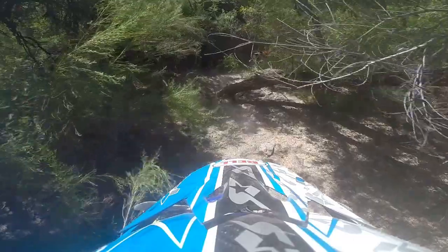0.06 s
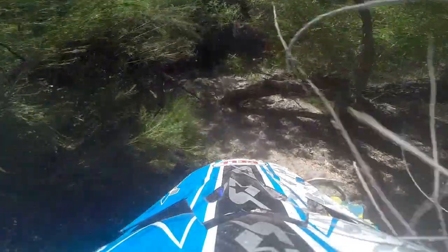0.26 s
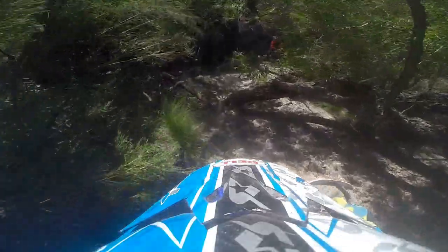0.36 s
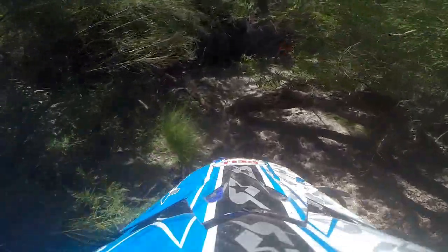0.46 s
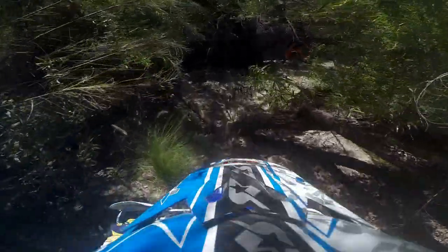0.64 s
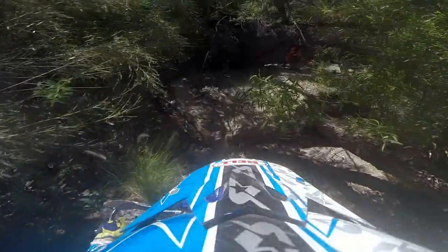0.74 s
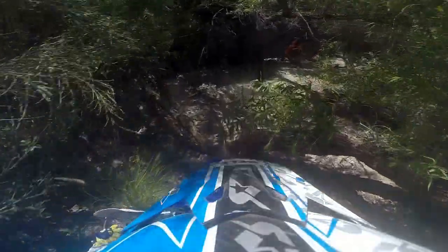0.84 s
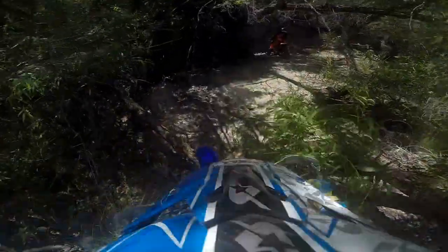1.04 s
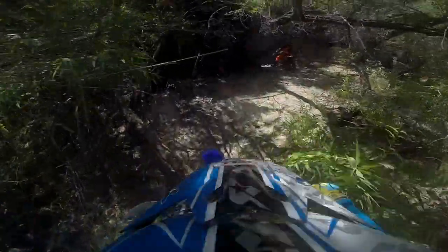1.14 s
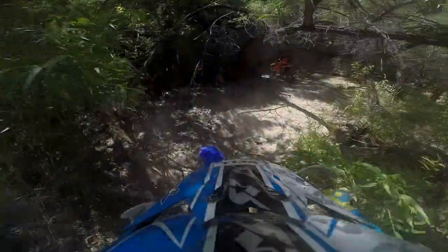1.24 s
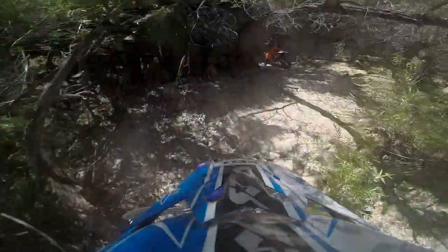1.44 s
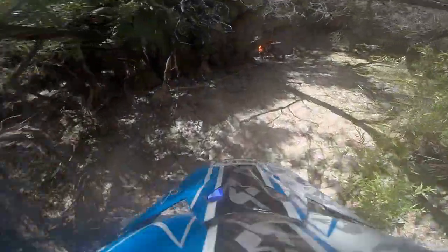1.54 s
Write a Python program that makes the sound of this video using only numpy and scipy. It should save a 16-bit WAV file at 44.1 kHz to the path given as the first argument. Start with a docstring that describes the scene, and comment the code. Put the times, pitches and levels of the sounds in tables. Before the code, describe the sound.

A two-stroke dirt bike putters along a brushy trail, heard from a helmet microphone. A branch knocks loudly and drags across it with a squeak. The throttle blips once, then another branch cracks against it, over light wind rumble.

```python
"""A two-stroke dirt bike creeps along a brushy trail, heard from a helmet camera.
The engine pops near idle and gets one blip of throttle; each firing echoes in the exhaust pipe
and rattles the cylinder. Wind buffets the microphone. Twice, branches knock on the camera housing,
hard enough to overload it; the first time, a branch also drags across it with a stick-slip squeak."""
import sys
import numpy as np
from scipy import signal
from scipy.fft import rfft, irfft
from scipy.io import wavfile

SR = 44100
rng = np.random.default_rng(int(sys.argv[2]) if len(sys.argv) > 2 else 0)


def pcm_store(signal):
    """Save signal as 16-bit PCM."""
    levels = np.round(np.clip(np.atleast_2d(signal), -1, 1) * 32767)
    wavfile.write(sys.argv[1], SR, levels.astype(np.int16).T)


N = 70560
T = np.arange(N) / SR


def from_db(db):
    """Decibels to gain."""
    return 10 ** (np.asarray(db) / 20)


def unit_rms(x):
    """Scale to unit rms."""
    return x / np.sqrt(np.mean(x ** 2) + 1e-20)


def curve(rows, column=1):
    """One column of a time table, interpolated per sample."""
    columns = np.transpose(rows)
    return np.interp(T, columns[0], columns[column])


def noise(spectrum, tilt_db_oct=0):
    """Unit-rms shaped noise; skirts fall 20 dB per octave before the tilt."""
    hz, db = np.transpose(spectrum)
    octave = np.log2(np.maximum(np.arange(N // 2 + 1) * SR / N, 1))
    outside = np.abs(octave - np.clip(octave, np.log2(hz[0]), np.log2(hz[-1])))
    shape_db = np.interp(octave, np.log2(hz), db) + tilt_db_oct * octave - 20 * outside
    return unit_rms(irfft(rfft(rng.standard_normal(N)) * from_db(shape_db), N))


def drift(rate_hz):
    """Smooth random modulation, unit rms."""
    return noise([(rate_hz / 10, 0), (rate_hz, 0)])


def resonate(x, modes):
    """Parallel two-pole resonators."""
    out = 0
    for hz, width_hz, db in modes:
        r = np.exp(-np.pi * width_hz / SR)
        b = np.array([1, 0, -1]) * (1 - r * r) / 2
        a = [1, -2 * r * np.cos(2 * np.pi * hz / SR), r * r]
        out = out + from_db(db) * signal.lfilter(b, a, x)
    return out


def burst(start_s, rise_s, decay_s):
    """Envelope: fast attack, exponential decay."""
    age_s = np.maximum(T - start_s, 0)
    return (1 - np.exp(-age_s / rise_s)) * np.exp(-np.minimum(age_s / decay_s, 80))


def play(clicks, shape):
    """One copy of the shape per click."""
    return signal.fftconvolve(clicks, shape)[:N]


# engine speed: (time [s], firing rate [Hz])
FIRING_RATE = [(0.0, 27.84), (0.2, 31.4), (0.38, 25.34), (0.7, 25.94), (0.98, 24.7), (1.07, 35.44),
               (1.13, 40.43), (1.2, 41.83), (1.35, 26.73), (1.45, 36.67), (1.6, 35.82)]
FIRING_ANCHOR_S, FIRING_JITTER_DB = 0.638, 0.5


def firings():
    """One click per crank turn, slightly uneven in strength."""
    turns = np.cumsum(curve(FIRING_RATE)) / SR
    whole_turns = np.floor(turns - np.interp(FIRING_ANCHOR_S, T, turns))
    clicks = np.diff(whole_turns, prepend=whole_turns[0])
    return clicks * from_db(FIRING_JITTER_DB * rng.standard_normal(N))


def muffler(x, low_hz=115, high_hz=894):
    """The muffler band-passes the pressure pulses, taking off their edge."""
    band = signal.butter(2, [low_hz, high_hz], "band", fs=SR, output="sos")
    return signal.sosfilt(band, x + 1e-18)


# pressure wave and its pipe reflections: (delay [s], gain [ratio])
PIPE_ECHOES = [(0, 1.0), (.0023, 0.98), (.0040, -1.5), (.0061, 0.17), (.0086, 0.14), (0.0104, -0.018),
               (0.0141, -0.33), (0.0191, -0.6)]
# pipe resonances: (frequency [Hz], width [Hz], gain [dB])
PIPE_MODES = [(184.7, 62, 0.5), (379, 35, 4.5), (470, 42, 0)]
# gas leaving the pipe: (frequency [Hz], density [dB])
CHUFF_SPECTRUM = [(90, -15.5), (150, 5.5), (400, -11.5), (600, 0.5), (1000, -23.5)]
# pops at the microphone: (time [s], level [dB])
POP_LEVEL = [(0, -50), (.11, -41), (.16, -37.5), (.23, -34.5), (.39, -56.5), (.56, -49.5), (.72, -45),
             (.755, -47.5), (.83, -44), (.915, -43), (.955, -45.5), (.99, -38), (1.07, -34), (1.14, -31),
             (1.21, -45.5), (1.29, -34), (1.36, -65), (1.40, -43), (1.46, -45.5), (1.52, -57.5),
             (1.6, -64.5)]
# narrow pipe resonances: (frequency [Hz], width [Hz], gain [dB])
BOOM_MODES = [(186, 9.3, 14), (351, 10, -23.5), (426, 35, -3.5)]
# pipe boom, peaking as the throttle opens: (time [s], level [dB])
BOOM_LEVEL = [(0, -35.5), (.22, -47.5), (.39, -65), (.9, -50), (1.0, -54), (1.07, -26), (1.13, -36.5),
              (1.2, -33), (1.28, -52), (1.36, -68), (1.44, -48), (1.6, -58.5)]
POP_RISE_S, CHUFF_DB = 0.00017, -11.5


def exhaust(fired):
    """Each pop bounces along the pipe, sets it booming and exits with a chuff of gas."""
    wave = sum(gain * burst(delay_s, POP_RISE_S, decay_s=0.0015) for delay_s, gain in PIPE_ECHOES)
    pops = muffler(play(fired, wave))
    pops = unit_rms(pops + resonate(pops, PIPE_MODES))
    gas_flow = play(fired, burst(0, POP_RISE_S, decay_s=0.048))
    chuff = from_db(CHUFF_DB) * unit_rms(noise(CHUFF_SPECTRUM) * gas_flow)
    boom = unit_rms(resonate(muffler(fired), BOOM_MODES))
    return from_db(curve(POP_LEVEL)) * (pops + chuff) + from_db(curve(BOOM_LEVEL)) * boom


# cylinder excitation: (frequency [Hz], density [dB])
CYLINDER_DRIVE = [(500, -4), (1200, -0.5), (3600, -1), (6000, -2.5), (9000, -6.5), (14000, -27)]
# cylinder resonances: (frequency [Hz], width [Hz], gain [dB])
CYLINDER_MODES = [(1276, 45, 0.5), (1630, 83, -6), (1856, 66, -5), (2180, 70, -14), (2610, 100, -13.5),
                  (2880, 50, -12), (3305, 32, -8)]
# rattle after each firing: (frequency [Hz], density [dB])
RATTLE_SPECTRUM = [(500, -10.5), (1200, 4), (1900, -2), (3000, -11.5), (6000, -24.5)]
# broadband clatter: (frequency [Hz], density [dB])
CLATTER_SPECTRUM = [(300, -1), (500, -4.5), (600, -17), (800, -10), (1100, -10), (1450, -17), (1900, -9.5),
                    (2300, -13), (2700, -20), (3400, -15.5), (4000, -20.5), (5000, -23), (6000, -29),
                    (8000, -36.5), (11000, -40), (13500, -51.5), (16000, -77.5)]
# all mechanical noise: (time [s], level [dB])
CLATTER_LEVEL = [(0, -30), (.07, -38.5), (.13, -38.5), (.23, -42.5), (.39, -56), (.55, -54), (.7, -51.5),
                 (.8, -48.5), (.97, -45.5), (1.02, -40), (1.07, -32), (1.17, -33), (1.22, -37.5),
                 (1.28, -41.5), (1.38, -46), (1.45, -48), (1.52, -51), (1.6, -50.5)]
CYLINDER_DB, RATTLE_DB, BROADBAND_DB = -4, -8, -5


def clatter(fired):
    """Piston and cylinder clatter throughout and rattle just after each firing."""
    beat = 1 + play(fired, burst(0, rise_s=0.00069, decay_s=0.036))
    cylinder = from_db(CYLINDER_DB) * unit_rms(resonate(beat * noise(CYLINDER_DRIVE), CYLINDER_MODES))
    shake = play(fired, burst(0, POP_RISE_S, decay_s=0.02))
    rattle = from_db(RATTLE_DB) * unit_rms(shake * noise(RATTLE_SPECTRUM))
    broadband = from_db(BROADBAND_DB) * unit_rms(beat * noise(CLATTER_SPECTRUM))
    return from_db(curve(CLATTER_LEVEL)) * (broadband + cylinder + rattle)


# microphone rumble: (frequency [Hz], density [dB])
WIND_SPECTRUM = [(12, 2.5), (25, -13.5), (60, -8), (110, -4.5), (200, -13), (500, -44.5)]
# wind rumble, dropping after the knocks and slowly returning: (time [s], relative level [dB])
WIND_LEVEL = [(0, -30), (.2, -33.5), (.4, -48), (.7, -49), (.8, -43.5), (.9, -43), (1.1, -34.5),
              (1.3, -35.5), (1.45, -55), (1.6, -39.5)]


def wind(gain_db=-3.5):
    """Wind buffets the microphone with a low rumble."""
    return from_db(gain_db + curve(WIND_LEVEL)) * noise(WIND_SPECTRUM)


# shell resonances: (frequency [Hz], width [Hz], gain [dB])
HOUSING_MODES = [(1050, 45, -6.5), (1916, 23, -4), (2384, 70, -2), (3225, 110, -3.5), (3712, 40, -4),
                 (4810, 110, -3.5), (5640, 110, -5), (5930, 120, 1.5), (8480, 260, -5)]


def housing(contact, gain_db=-3.5):
    """The plastic shell transmits a contact and adds its resonances."""
    return from_db(gain_db) * (contact + resonate(contact, HOUSING_MODES))


# sharp knocks and faint ticks:
# (time [s], crack level [dB], decay [s], tilt [dB/octave], ring [Hz], ring level [dB])
KNOCKS = [(0.2482, -5, 0.0071, -0.8, 1103, -7), (0.2555, -10, 0.0035, -5, 3187, -14),
          (0.2598, -3, 0.0051, -3, 1220, -20), (0.2605, -11, 0.015, 0.5, 1770, -13),
          (.3290, -24.5, .008, 2.5, 3640, -6.5), (0.3372, -28.5, 0.016, -2, 1830, -26),
          (0.3447, -8, 0.0057, 2.5, 5894, -8.5), (0.352, -8, 0.0046, 0, 5300, -17),
          (0.3587, -16, 0.0026, 0.5, 2280, -19.5), (1.034, -28, .005, -5.5, 2930, -28),
          (1.2762, -5.5, 0.0026, 0.5, 3140, -9.5), (1.2828, -17, 0.0022, -3, 2600, -16),
          (1.2868, -21, 0.0028, 11, 3180, -20), (1.2912, -4.5, 0.0035, 1, 5670, -3),
          (1.2980, -15, .002, -7, 5444, -21.5), (1.3028, -12, 0.0034, 0, 3240, -15.5),
          (1.3150, -1.5, 0.0025, -1, 3090, 0), (1.3206, -25.5, 0.0046, 3, 3050, -17.5),
          (1.354, -50, .004, 2.5, 1990, -32), (1.3596, -37, 0.01, -3, 1270, -37),
          (1.376, -44.5, 0.0016, 5.5, 6150, -39)]
# contact on the shell: (frequency [Hz], density [dB])
CONTACT_SPECTRUM = [(120, -9.5), (200, -12), (400, -14.5), (700, -8.5), (950, -19), (1200, -3), (1800, -1),
                    (2300, -4), (3100, -1), (4200, -6.5), (5700, -9), (6800, -10.5), (8000, -18.5),
                    (9300, -12.5), (10700, -24), (13000, -27), (16000, -39)]
# mount and its metal parts: (frequency [Hz], level re crack [dB], T60 [s])
MOUNT_MODES = [(2864, -47.5, .12), (4950, -39.5, 0.19), (5630, -35, 0.075)]
KNOCK_GRAIN_DB, TICK_DB, TICK_TILT_DB_OCT, RING_PEAK_S = 2, 3, 4, 0.00099


def knocks():
    """Sharp knocks and faint ticks: each excites the housing and mount and rings at its own pitch."""
    cracks, rings = np.zeros(N), np.zeros(N)
    grain = from_db(KNOCK_GRAIN_DB * drift(900))
    for start_s, crack_db, decay_s, tilt_db_oct, ring_hz, ring_db in KNOCKS:
        crack = burst(start_s, rise_s=0.000067, decay_s=decay_s) * noise(CONTACT_SPECTRUM, tilt_db_oct)
        bright_noise = noise(CONTACT_SPECTRUM, tilt_db_oct + TICK_TILT_DB_OCT)
        tick = burst(start_s, rise_s=1 / SR, decay_s=0.00034) * bright_noise
        cracks += from_db(crack_db) * (crack * grain + from_db(TICK_DB) * tick)
        age_s = np.maximum(T - start_s, 0)
        swell = np.minimum(age_s / RING_PEAK_S, 80)
        rings += from_db(ring_db) * swell * np.exp(1 - swell) * np.sin(2 * np.pi * ring_hz * age_s)
        for hz, mode_db, t60_s in MOUNT_MODES:
            rings += from_db(crack_db + mode_db - 60 * age_s / t60_s) * np.sin(2 * np.pi * hz * age_s)
    return housing(cracks) + rings


# heavy blows: (time [s], level [dB])
THUMPS = [(0.259, -17.5), (1.316, -30.5)]


def thumps(rock_hz=88):
    """Heavy blows rock the camera on its mount: a low, dying tone."""
    out = np.zeros(N)
    for start_s, db in THUMPS:
        envelope = from_db(db) * burst(start_s, rise_s=0.005, decay_s=0.033)
        out += envelope * np.sin(2 * np.pi * rock_hz * (T - start_s))
    return out


# branch sliding on the housing: (time [s], scrape level [dB], squeak [Hz], squeak level [dB])
DRAG = [(.262, -22.5, 793.6, -67.5), (.272, -19, 792, -62.5), (.286, -32, 803.6, -48),
        (.290, -18, 779, -14), (.303, -37, 683.6, -25), (.310, -18.5, 651, -20.5),
        (.320, -24.5, 730, -18.5), (.331, -16.5, 830, -16), (.341, -16, 710, -24),
        (.350, -26.5, 800, -19.5), (.360, -13, 830, -44), (.367, -47.5, 836, -49.5),
        (.385, -67.5, 833, -66.5)]
# friction noise: (frequency [Hz], density [dB])
SCRAPE_SPECTRUM = [(200, -2), (500, -8.5), (1200, -4), (1550, -9.5), (1900, 5.5), (2800, -1), (3600, 6.5),
                   (4500, 4), (5700, 0), (6800, -27.5), (10000, -26), (16000, -34.5)]
SQUEAK_WOBBLE, OVERTONE_DB, RASP_DB = 0.074, -17.5, 2.5
SCRAPE_GRAIN_DB, SNAPS_PER_S, SNAP_DB = 2, 170, -15


def branch_drag():
    """Stick-slip friction: a raspy squeak, a scrape on each slip and snaps of catching bark."""
    scrape_db, squeak_hz, squeak_db = (curve(DRAG, column) for column in (1, 2, 3))
    phase = 2 * np.pi * np.cumsum(squeak_hz * (1 + SQUEAK_WOBBLE * drift(250))) / SR
    squeak = (np.sin(phase) + from_db(OVERTONE_DB) * np.sin(2 * phase)) * from_db(RASP_DB * drift(240))
    slip = 1 + np.sin(phase)
    scrape = unit_rms(noise(SCRAPE_SPECTRUM) * slip * from_db(SCRAPE_GRAIN_DB * drift(310)))
    catches = (rng.random(N) < SNAPS_PER_S / SR).astype(float)
    snap_envelope = play(catches, burst(0, rise_s=1 / SR, decay_s=0.00015))
    snaps = from_db(SNAP_DB) * unit_rms(snap_envelope * noise(CONTACT_SPECTRUM, tilt_db_oct=-1))
    touching = (T > DRAG[0][0]) & (T < DRAG[-1][0])
    return touching * (from_db(scrape_db) * housing(scrape + snaps) + from_db(squeak_db) * squeak)


def scene():
    """Engine, branches and wind at the helmet, mono."""
    fired = firings()
    engine = exhaust(fired) + clatter(fired)
    contacts = knocks() + thumps() + branch_drag()
    return (engine + contacts + wind())[None]


def record(dry, ceiling=1.23, stopband_hz=16300):
    """The camera soft-clips the loudest knocks, then cuts the top treble."""
    clipped = ceiling * np.tanh(dry / ceiling)
    lowpass = signal.cheby2(12, 60, stopband_hz, fs=SR, output="sos")
    return signal.sosfilt(lowpass, clipped)


dry = scene()
out = record(dry)
pcm_store(out)
```